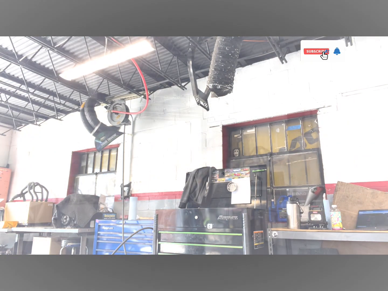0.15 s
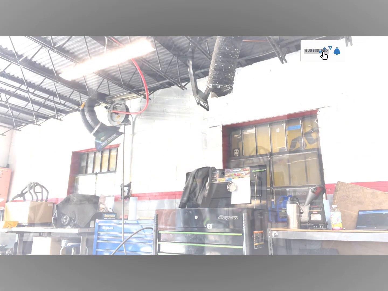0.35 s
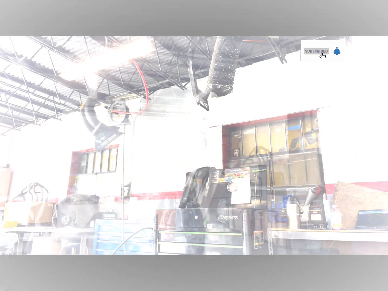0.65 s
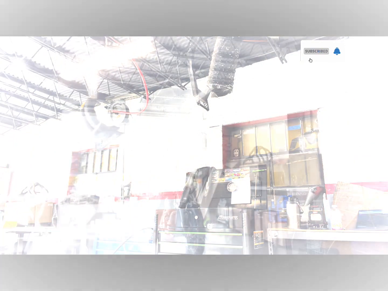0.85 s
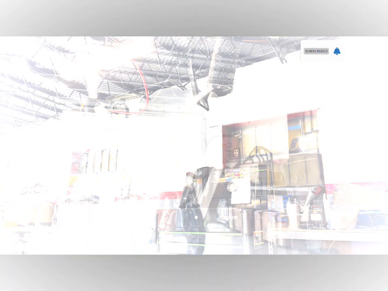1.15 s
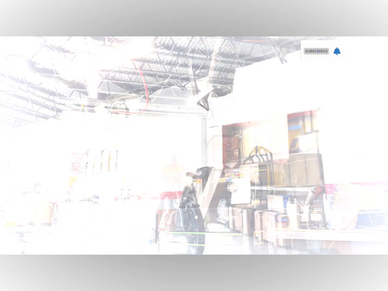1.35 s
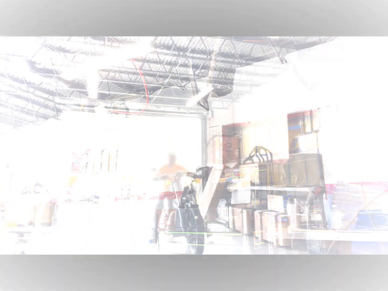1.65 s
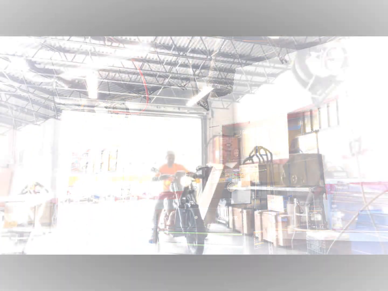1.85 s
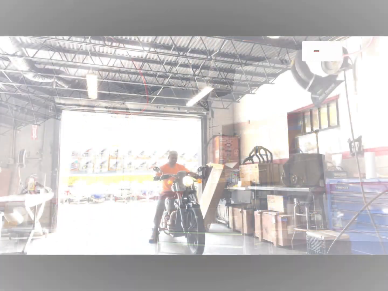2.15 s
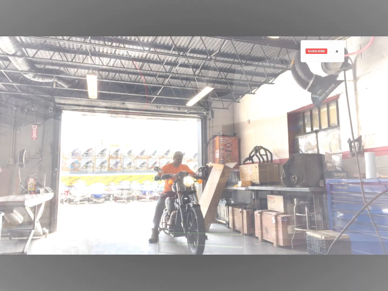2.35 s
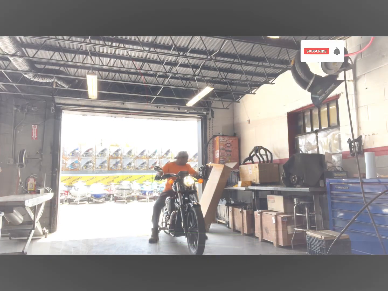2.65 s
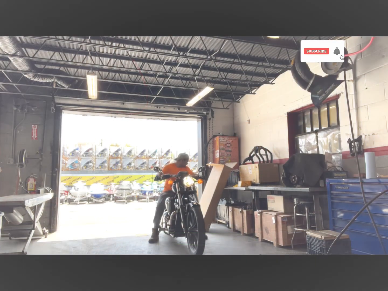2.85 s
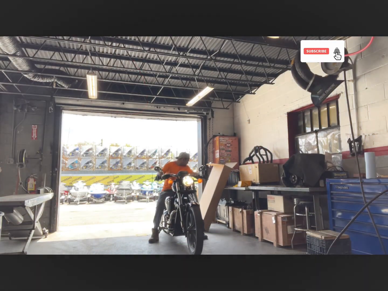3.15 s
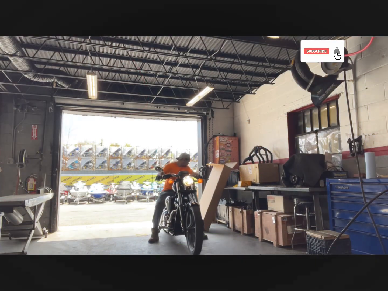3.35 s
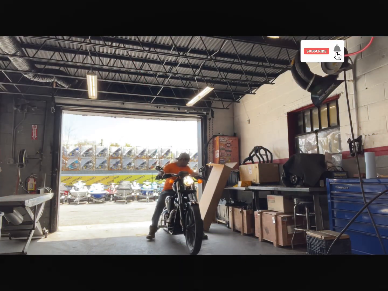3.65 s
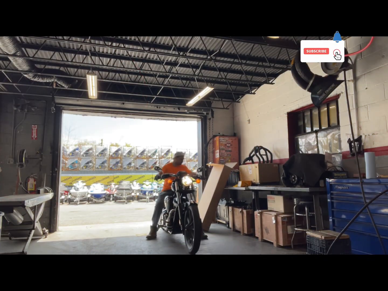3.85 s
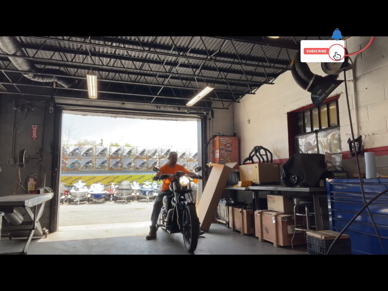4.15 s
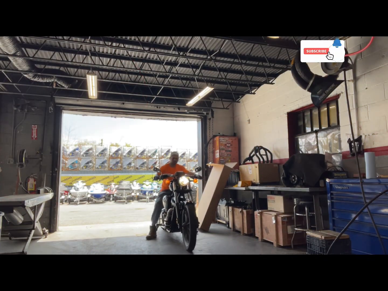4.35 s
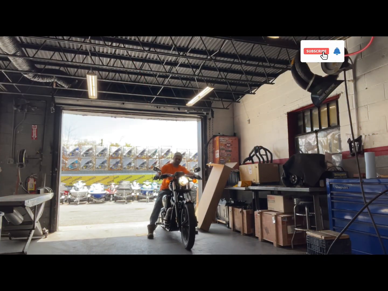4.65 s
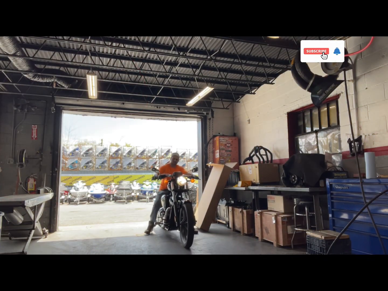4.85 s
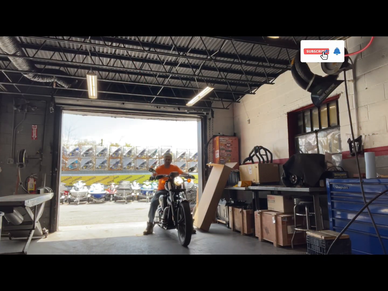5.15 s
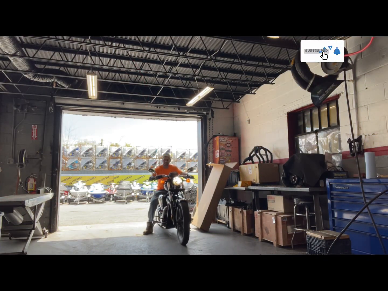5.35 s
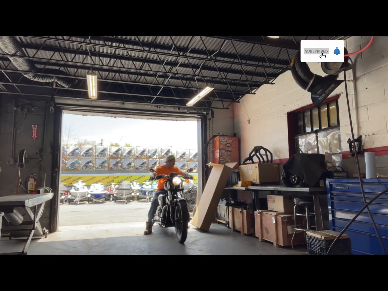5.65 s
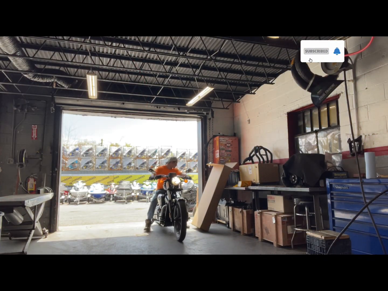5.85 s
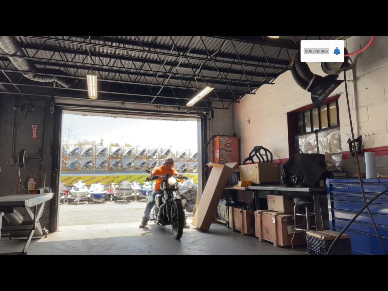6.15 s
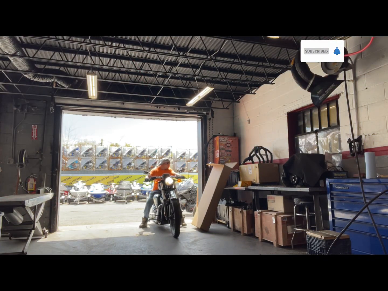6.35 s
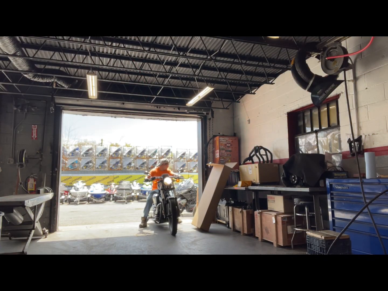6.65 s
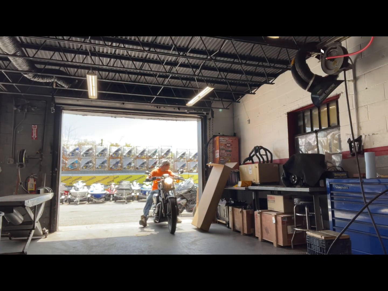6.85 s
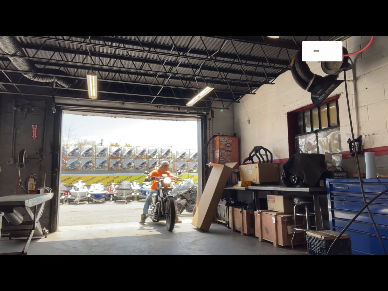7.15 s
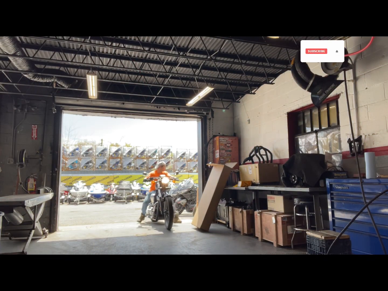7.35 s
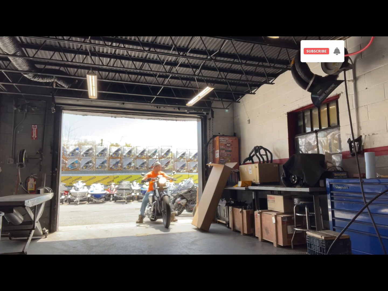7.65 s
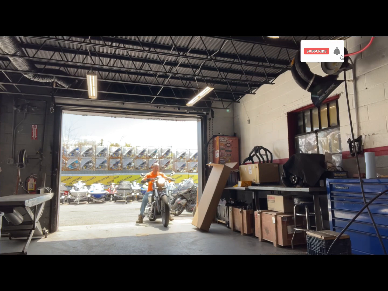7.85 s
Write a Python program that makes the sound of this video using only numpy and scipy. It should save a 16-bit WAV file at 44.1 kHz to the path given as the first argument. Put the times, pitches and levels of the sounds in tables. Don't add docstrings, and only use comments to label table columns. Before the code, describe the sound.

In a hard-walled workshop, a two-cylinder motorcycle idles steadily in uneven paired thumps. It starts distant and echoing, then cuts abruptly to a louder, closer view. Soon a pipe spits one rough burst. Exhaust roar and loose metallic rattle swell after each firing as the machine moves back to the open door, thinning slightly. Stereo microphone stays inside the bay.

```python
import sys
import numpy as np
from scipy import signal
from scipy.fft import rfft, irfft, next_fast_len
from scipy.io import wavfile
from scipy.ndimage import uniform_filter1d

SR = 44100
rng = np.random.default_rng(int(sys.argv[2]) if len(sys.argv) > 2 else 0)


def voltage_ratio(level):
    return 10 ** (np.asarray(level, float) / 20)


def materialize(psi):
    bounded = np.clip(np.atleast_2d(psi).T, -1, 1)
    quanta = np.round(bounded * 32767).astype(np.int16)
    wavfile.write(sys.argv[1], SR, quanta)


N = 352359
REAR_TURN = 405 / 720


def evened(x):
    return x / np.sqrt(np.mean(x ** 2) + 1e-20)


def curve(rows, column):
    rows = np.asarray(rows)
    return np.interp(np.arange(N) / SR, rows[:, 0], rows[:, column])


def coloured(x, points):
    hz, db = np.transpose(points)
    size = next_fast_len(N)
    f = np.fft.rfftfreq(size, 1 / SR)
    gain = voltage_ratio(np.interp(np.log(f + 1), np.log(hz), db, left=-70, right=-90))
    return irfft(rfft(x, size) * gain)[..., :N]


def resonate(x, hz, width):
    turn = np.exp(2j * np.pi * np.cumsum(hz * np.ones(N)) / SR)
    r = np.exp(-np.pi * width / SR)
    smooth = signal.lfilter([1], np.convolve([1, -r], [1, -r]), x / turn)
    return evened((turn * smooth).real)


def bay(x, t60):
    t = np.arange(SR // 2) / SR
    taps = rng.standard_normal((2, len(t))) * (rng.random((2, len(t))) < .05)
    taps *= voltage_ratio(-60 * t / t60)
    return signal.fftconvolve(x[None], taps / np.linalg.norm(taps[0]), axes=1)[:, :N]


def crank(speed, turn):
    turns = np.cumsum(curve(speed, 1)) / SR
    turns += turn - turns[round(speed[0][0] * SR)]
    whole = np.arange(np.ceil(turns[0]), turns[-1] - REAR_TURN)
    return turns, [np.interp(whole + k, turns, np.arange(N) / SR) for k in (0, REAR_TURN)]


def boom(firings, places_s, modes, heard_s):
    uneven_db, mode_db, slip_ms = .5, .6, .1
    step, length = 20, 1100
    out = np.zeros(N // step + 1200)
    for cylinder, times in enumerate(firings):
        for s in times[(times > heard_s[0]) & (times < heard_s[1])]:
            luck = rng.standard_normal((13, 2))
            at = int(s * SR / step)
            nearnesses = [np.interp(s, places_s, row) for row in np.eye(len(places_s))]
            for nearness, table in zip(nearnesses, modes):
                if nearness == 0:
                    continue
                hz, t60, front, rear, ms = np.transpose(table)[:, :, None]
                own = luck[1:len(hz) + 1]
                push = (front, rear)[cylinder] * voltage_ratio(uneven_db * luck[0, 0] + mode_db * own[:, :1])
                t = (at + np.arange(length)) * step / SR - s
                t = np.maximum(t - (ms + slip_ms * own[:, 1:]) / 1000, 0)
                rings = (push * voltage_ratio(-60 * t / t60) * np.sin(2 * np.pi * hz * t)).sum(0)
                out[at:at + length] += np.sqrt(nearness) * rings
    return signal.resample_poly(out, step, 1)[:N]


def throb_db(turns):
    fall, uneven, rear_flow = .3, .2, .63
    part = turns % 1
    is_front = part < REAR_TURN
    since = np.where(is_front, part, part - REAR_TURN)
    burn = (2 * np.floor(turns - turns[0] // 1) + ~is_front).astype(int)
    strength = 1 + uneven * rng.standard_normal(200)[burn]
    strength = strength * np.where(is_front, 1, rear_flow)
    return uniform_filter1d(strength * np.exp(-(since / fall) ** 2), size=300)


def patchy(patch_db):
    a, b = rng.standard_normal((N // 128 + 5, 257, 2, 2)).T
    patches = rng.standard_normal((N // 128 + 5, 257)).T
    patches = uniform_filter1d(patches, size=16, axis=1)
    patches = evened(uniform_filter1d(patches, size=3, axis=0))
    spectrum = (a + 1j * b) * voltage_ratio(patch_db * patches)
    return signal.istft(spectrum, nperseg=512, noverlap=384)[1][:, :N]


def pipe_rings(drive, near):
    # f/Hz, width/Hz, level/dB
    ring_notes = [(336.1, 16, -6.5), (365.1, 7.2, -6.5), (769, 15, -18.5), (1145.5, 17, -24),
                  (1457, 100, -24.5), (2694, 99, -28.5)]
    away_s, away_db, takes_s = 5.2, -5, 1.8
    size = next_fast_len(N)
    f = np.fft.rfftfreq(size, 1 / SR)
    peaks = sum(voltage_ratio(db) / np.sqrt(width) / (1 + (2 * (f - hz) / width) ** 2)
                for hz, width, db in ring_notes)
    rings = evened(irfft(rfft(drive, size) * peaks)[:N])
    turned = np.clip((np.arange(N) / SR - away_s) / takes_s, 1 - near, 1)
    return voltage_ratio(away_db * turned - 5.5) * rings


def hollow_rings(drive, near):
    # t/s, f/Hz, level/dB
    doorway = [(1.3, 432, -21.5), (5.8, 407, -17.5), (6.6, 466, -7.5), (7.3, 484, -6.5), (8, 530, -10)]
    # t/s, f/Hz, level/dB
    corner = [(0, 426, -8.5), (1.29, 433, -7)]
    hollow = doorway if near else corner
    return sum(voltage_ratio(curve(hollow, 2) + db) * resonate(drive, ratio * curve(hollow, 1), 103)
               for ratio, db in ((1, 0), (1.4, -15)))


def roar(flow, firings, near):
    # f/Hz, level/dB
    jet_share = [(10, -34), (450, -9.5), (900, -3), (2000, -0.5), (22050, 0.)]
    # f/Hz, level/dB
    edge_share = [(10, 0.5), (450, -0.5), (900, -1.5), (2000, -7), (22050, -19)]
    # f/Hz, level per Hz/dB
    mid_colour = [(160, -12), (280, 6), (302, -5.5), (366, -12), (398, -9), (473, -7), (624, -10.5),
                  (773, -8), (957, -16), (1160, -13), (1320, -18.5), (1500, -14), (1690, -22.5),
                  (2370, -20), (3600, -33.5), (4680, -37.5), (7920, -120)]
    # f/Hz, level per Hz/dB
    side_colour = [(160, -36), (280, 7), (302, -7), (362, -19.5), (429, 0.5), (483, -7), (624, -10.5),
                   (1510, -19.5), (1690, -20.5), (2230, -19.5), (3600, -34.5), (4680, -66), (7920, -120)]
    # f/Hz, level/dB
    far_colour = [(10, -6), (300, -6), (380, 3), (900, 6.5), (2200, 8), (22050, 6)]
    edges = np.zeros(N)
    at = (np.concatenate(firings) * SR).astype(int)
    edges[at] = voltage_ratio(1.2 * rng.standard_normal(200)[:len(at)])
    jet = patchy(3.23) * voltage_ratio(2.7 * flow)
    drive = coloured(evened(jet), jet_share) + coloured(evened(bay(edges, 0.75)), edge_share)
    mid = evened(coloured(drive[0], mid_colour))
    side = evened(coloured(drive[1], side_colour))
    mid = mid + pipe_rings(drive[0], near) + hollow_rings(drive[0], near)
    out = np.array([mid, side - 0.033 * mid])
    return out if near else coloured(out, far_colour)


def clatter(flow):
    # f/Hz, level per Hz/dB
    mid_colour = [(2500, -41), (3200, -6), (4000, -5), (5400, 2), (6500, 1.5), (8100, -4), (8450, -18),
                  (9350, -17), (9700, -8.5), (10500, -5.5), (12000, -14), (13200, -24), (14500, -63)]
    # f/Hz, level per Hz/dB
    side_colour = [(2500, -37), (3200, -14), (4000, -6), (5400, -3.5), (7000, -3.5), (9000, -5.5),
                   (10600, -12), (11200, -34), (12300, -30), (13000, -20), (15000, -31)]
    drive = patchy(3.6) * voltage_ratio(7. * flow)
    mid = evened(coloured(drive[0], mid_colour))
    side = evened(coloured(drive[1], side_colour))
    return np.array([mid, voltage_ratio(0.3) * side])


def engine(speed, turn, places_s, modes, opening, mix, near):
    # f/Hz, level/dB
    boom_tilt = [(20, -9), (42, 7.5), (65, 2.36), (82, 2), (130, 2.83), (220, 2.63), (270, 4.5),
                 (330, -3.1), (700, 0.5)]
    # f/Hz, level/dB
    boom_side = [(20, -20), (60, -21), (110, -13.5), (200, -10), (360, -0.5), (700, -6)]
    turns, firings = crank(speed, turn)
    heard_s = speed[0][0] - .5, speed[-1][0] + .5
    low = coloured(boom(firings, places_s, modes, heard_s), boom_tilt)
    flow = throb_db(turns)
    power = uniform_filter1d(uniform_filter1d(low ** 2, size=16000), size=16000)
    slow = np.sqrt(abs(power) + 1e-7)
    ahead = -signal.hilbert(low, next_fast_len(N))[:N].imag
    echo = bay(low, .2)[0]
    echo = echo - low * (echo @ low) / (low @ low)
    side = coloured(.5 * ahead + echo, boom_side)
    low = np.array([low, voltage_ratio(1.5) * side - 0.064 * low]) / slow
    since = np.arange(N) / SR - opening[0][0]
    layers = low, roar(flow, firings, near), clatter(flow)
    return sum(voltage_ratio(db + share * curve(opening, 1) + drift_db * since) * layer
               for (db, share, drift_db), layer in zip(mix, layers))


def spit():
    # t/s, level/dB, t60/s
    burst = (2.027, -22, .62)
    # f/Hz, level per Hz/dB
    burst_colour = [(400, -5), (520, -8.5), (850, -5.5), (1600, -16.5), (2500, -15.5), (3300, -21.5),
                    (5400, -22), (8000, -33), (8600, -39), (9300, -67), (10000, -34), (13000, -46)]
    rise_s, hold_s = .005, .065
    s, db, t60 = burst
    t = np.arange(N) / SR - s
    shape = (t > 0) * np.clip(t / rise_s, 0, 1)
    shape *= voltage_ratio(-60 * np.clip(t - hold_s, 0, 1) / t60)
    shape *= voltage_ratio(0.71 * evened(uniform_filter1d(rng.standard_normal(N), size=90)))
    return voltage_ratio(db) * shape * evened(coloured(rng.standard_normal((2, N)), burst_colour))


def scene():
    # t/s, four-stroke cycle rate/Hz
    speed_far = [(0, 8.5495), (.3406, 8.8162), (1.29, 8.4699)]
    speed_near = [(1.289, 7.984), (1.938, 8.342), (2.13, 8.081), (2.518, 8.152), (3.118, 7.799),
                  (3.65, 8.239), (4.088, 7.79), (4.409, 8.182), (5.374, 7.955), (5.817, 8.586),
                  (6.461, 8.05), (6.611, 7.607), (7.18, 7.921), (7.427, 8.568), (7.99, 7.624)]
    # t/s, level/dB
    open_far = [(0, -1), (.5, -4.5), (1.29, -4)]
    open_near = [(1.29, 1), (1.8, 1), (2.5, 1.1), (3.2, 2), (4.1, 1.7), (4.7, 0), (5.3, 0.6), (5.8, -2),
                 (7, -1), (7.99, -4)]
    # level/dB, share of the opening followed, drift/(dB per s)
    mix_far = [
        (-16.5, 0.83, 4),
        (-38, 1, 1.6),
        (-50, 0.81, 1),
    ]
    mix_near = [
        (-11, 0.044, 0.086),
        (-28, 0.66, 0.0053),
        (-44.5, 1.07, -0.036),
    ]
    places_s = [
        2.6,
        4.5,
        5.9,
        7.0,
    ]
    # f/Hz, t60/s, push of front cylinder, of rear, arrival/ms
    boom_far = [(44.9, 0.11, -0.047, 0.101, 27.9), (63.7, 0.36, 0.102, -0.262, 35.9),
                (117.0, 0.07, -0.101, 0.358, 39.4), (130.7, 0.29, 0.048, -0.162, 24.7),
                (178.9, 0.07, -0.121, 0.038, 3.4), (184.3, 0.5, -0.072, 0.024, 37.0),
                (216.0, 0.21, -0.159, 0.117, 15.1), (237.2, 0.16, 0.057, 0.034, 8.1),
                (252.0, 0.3, -0.036, 0.022, 34.2), (325.3, 0.3, 0.013, 0.003, -2.0),
                (448.8, 0.36, -0.004, 0.009, 18.8)]
    boom_inside = [(55.4, 0.51, -0.163, -0.035, 11.6), (66.0, 0.51, -0.204, 0.142, 1.0),
                   (119.1, 0.16, -0.212, 0.367, 12.8), (123.0, 0.08, 0.455, -0.37, 39.2),
                   (139.7, 0.14, -0.405, 0.106, 39.9), (180.8, 0.32, 0.348, -0.096, 8.9),
                   (205.2, 0.15, -0.482, 0.099, 26.7), (219.6, 0.51, 0.189, -0.056, 15.0),
                   (256.0, 0.37, 0.096, -0.001, 39.8), (331.5, 0.51, 0.036, 0.006, 35.5),
                   (361.7, 0.51, -0.027, 0.01, 9.9), (433.5, 0.02, 0.003, -0.074, 16.4)]
    boom_midway = [(55.2, 0.51, -0.184, 0.013, 10.4), (66.0, 0.51, -0.197, 0.186, 0.1),
                   (111.4, 0.22, -0.097, 0.213, 12.3), (117.1, 0.06, 0.204, -0.24, 39.7),
                   (145.6, 0.37, -0.266, 0.036, 39.8), (182.9, 0.35, 0.319, -0.029, 9.0),
                   (206.7, 0.23, -0.22, 0.107, 26.8), (218.6, 0.33, 0.253, -0.099, 15.0),
                   (254.4, 0.51, 0.075, -0.005, 39.2), (325.1, 0.31, 0.04, 0.013, 34.7),
                   (363.0, 0.38, -0.029, 0.026, 10.0), (471.6, 0.43, 0.001, 0.006, 15.5)]
    boom_sill = [(58.8, 0.29, -0.036, 0.268, 39.6), (66.8, 0.25, 0.262, -0.464, 38.0),
                 (93.0, 0.18, 0.064, -0.126, 24.1), (129.4, 0.6, 0.087, -0.106, 26.2),
                 (147.8, 0.48, -0.165, -0.096, 32.2), (172.8, 0.59, 0.036, -0.099, 19.4),
                 (186.3, 0.38, -0.168, 0.004, 6.1), (214.0, 0.45, -0.086, 0.066, 36.2),
                 (221.8, 0.6, 0.164, 0.003, 11.1), (229.5, 0.45, -0.066, 0.07, 17.4),
                 (272.4, 0.37, 0.037, -0.045, 0.1), (336.7, 0.08, -0.05, 0.051, 32.8)]
    boom_door = [(58.8, 0.6, 0.259, -0.102, 3.2), (69.4, 0.22, 0.306, -0.366, 38.0),
                 (93.0, 0.11, -0.304, -0.096, 40.1), (122.7, 0.34, -0.203, 0.126, 38.1),
                 (140.4, 0.6, 0.013, 0.159, 3.1), (172.5, 0.6, -0.074, -0.009, 29.4),
                 (186.9, 0.6, 0.127, 0.02, 9.4), (208.6, 0.28, -0.112, -0.079, 4.0),
                 (219.5, 0.6, 0.166, -0.068, 20.8), (236.9, 0.08, 0.155, 0.277, 34.0),
                 (257.0, 0.6, -0.051, -0.006, 10.4), (328.5, 0.08, -0.067, -0.043, 28.6)]
    change_s = 1.2909
    turn_far, turn_near = .9369, .7691
    far = engine(speed_far, turn_far, [0], [boom_far], open_far, mix_far, 0)
    spots = [boom_inside, boom_midway, boom_sill, boom_door]
    near = engine(speed_near, turn_near, places_s, spots, open_near, mix_near, 0.99) + spit()
    since, at = np.arange(N) / SR - change_s, int(change_s * SR)
    near[0] += (far[0, at] - near[0, at] - .3) * np.exp(-abs(since) / .004)
    mid, side = np.where(since < 0, far, near)
    return np.array([mid + side, mid - side])


def top_cut(x):
    return signal.sosfilt(signal.butter(12, 13180, fs=SR, output="sos"), x)


def record(dry):
    # f/Hz, level/dB
    port_lean = [(10, -2), (60, -0.3), (230, 1.5), (650, -1.5), (1170, -1.4), (2120, 1.8), (3840, 0.9),
                 (22050, -0.2)]
    ports = np.array([coloured(port, [(hz, sign * db / 2) for hz, db in port_lean])
                      for port, sign in zip(dry, (1, -1))])
    bass_cut = signal.butter(2, 40, "highpass", fs=SR, output="sos")
    cut = signal.sosfiltfilt(bass_cut, ports)
    soft = cut / (1 + abs(cut / .97) ** 4) ** .25
    return top_cut(soft)


dry = scene()
out = record(dry)
materialize(out)
```